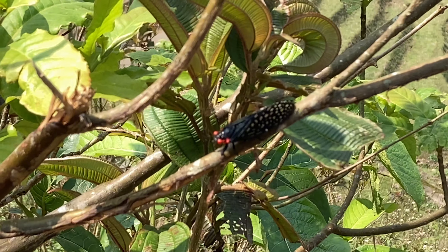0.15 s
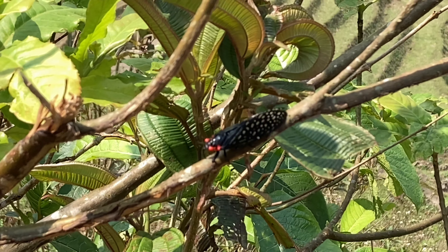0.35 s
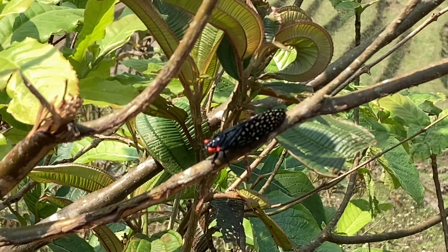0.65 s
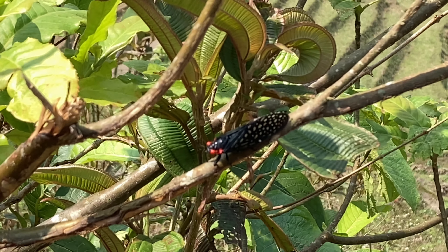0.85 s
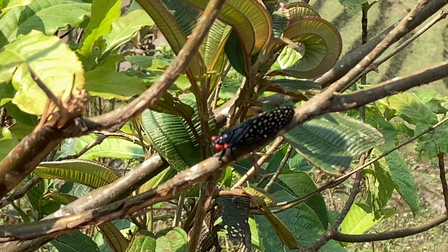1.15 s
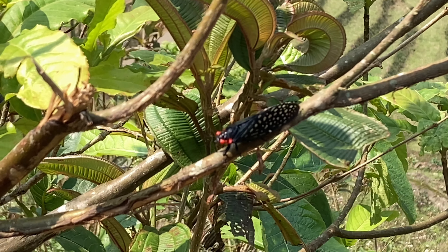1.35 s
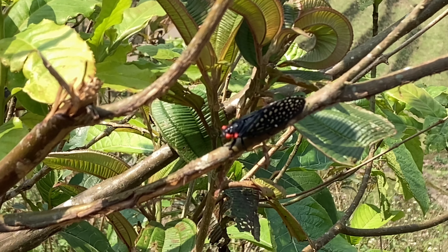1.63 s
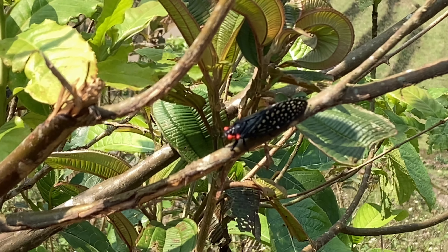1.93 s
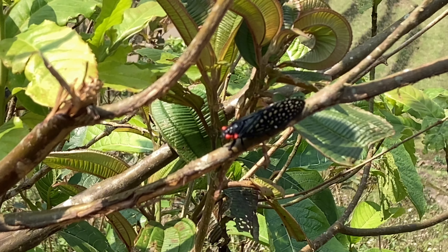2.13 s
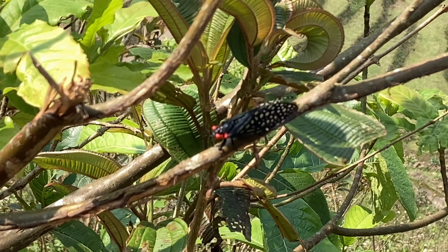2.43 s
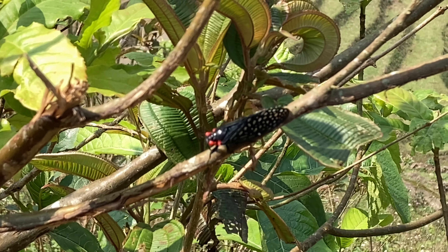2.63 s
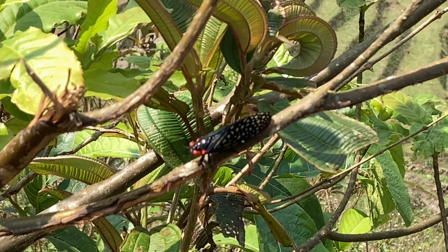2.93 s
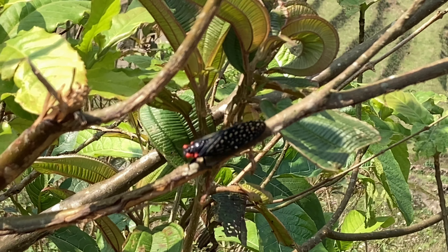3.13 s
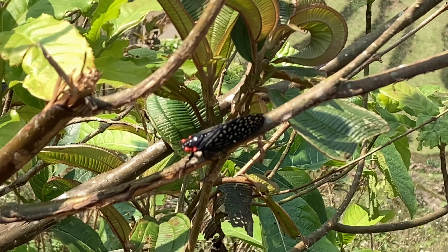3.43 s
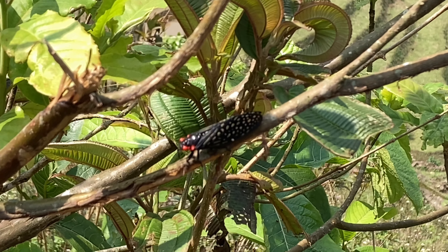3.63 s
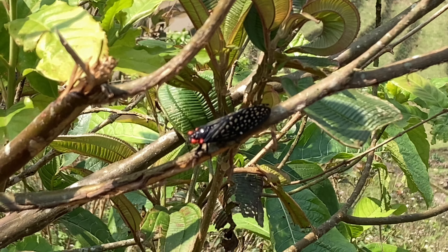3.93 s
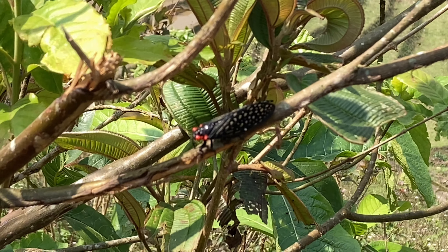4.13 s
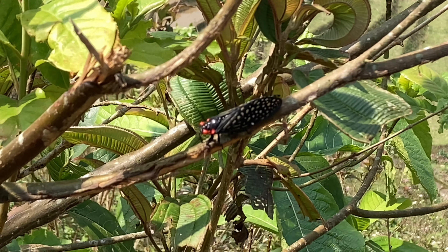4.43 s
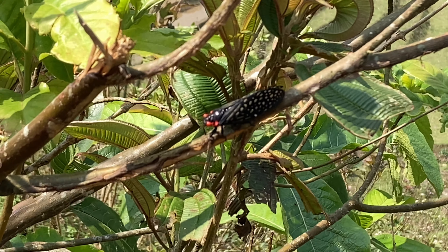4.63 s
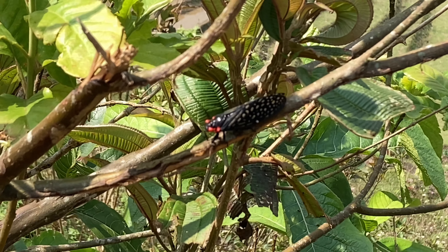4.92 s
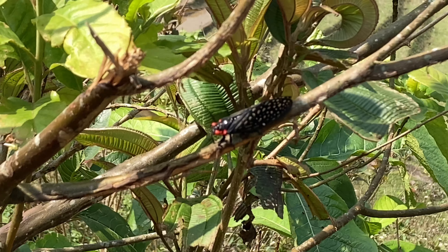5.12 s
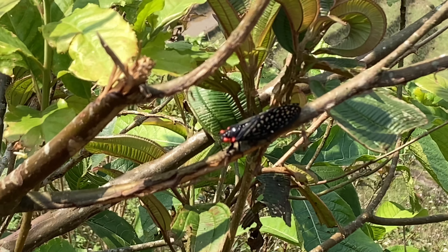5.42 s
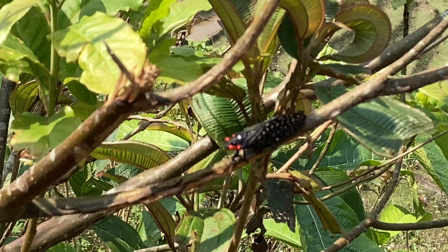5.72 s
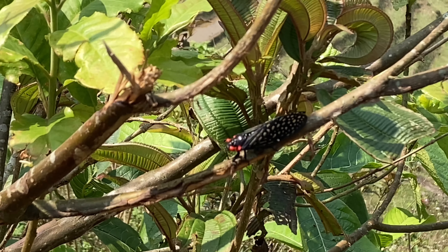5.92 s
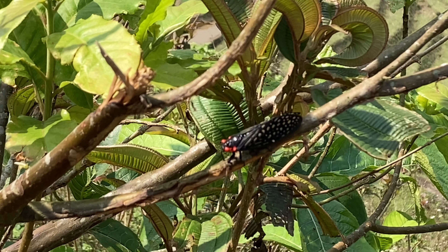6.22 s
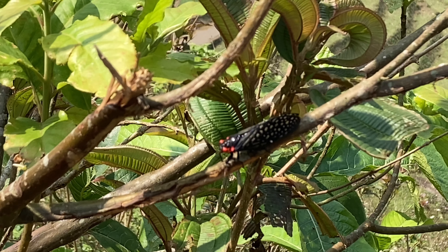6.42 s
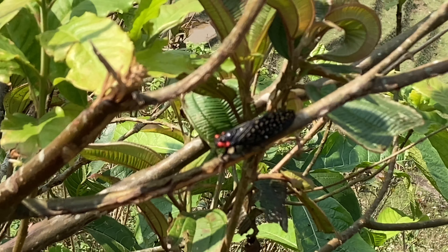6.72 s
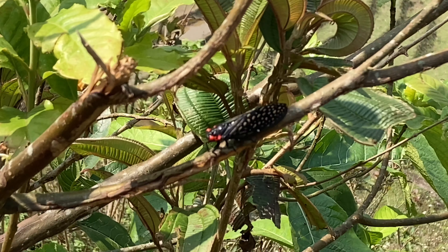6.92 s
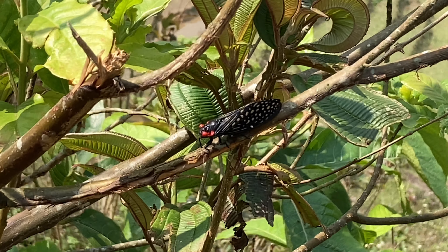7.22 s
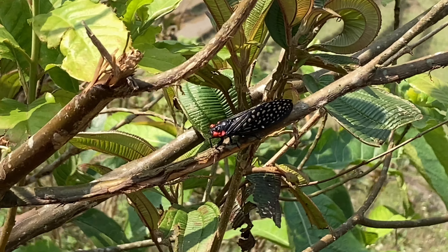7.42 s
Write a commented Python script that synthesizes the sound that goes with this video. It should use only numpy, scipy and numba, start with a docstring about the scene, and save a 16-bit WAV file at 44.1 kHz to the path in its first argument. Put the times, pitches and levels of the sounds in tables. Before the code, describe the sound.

Outdoors among leafy shrubs, a cicada sings very close to a small stereo microphone. Harsh bright rasps pulse about twelve per second, the last held longer, then a dry roll of ticks speeds up and softens. The cycle repeats about every two seconds with a few tiny thin whistles. Behind it lie a distant engine throb, a wavering low drone and gusty wind bumps.

```python
"""A cicada sings close by: thirteen swelling rasps, the last one held, then a quickening roll of dry ticks,
over and over, with a few thin whistles. Its tymbal ribs buckle one after another as band-limited clicks,
which ring the abdomen through filters and a moving resonance; leaves scatter the song as decaying noise echoes.
Behind it far engine thuds excite a wandering boom, a drone wavers under gusty low-pitched wind noise,
faint open air hisses, and one soft blip falls in pitch."""
import sys
import numpy as np
from scipy import signal
from scipy.fft import rfft, irfft
from scipy.io import wavfile
from scipy.ndimage import uniform_filter1d
from numba import njit

SR = 44100
rng = np.random.default_rng(int(sys.argv[2]) if len(sys.argv) > 2 else 0)


def master(y):
    """Save y as 16-bit WAV."""
    cut = np.clip(np.atleast_2d(y).T, -1, 1)
    pcm = np.round(cut * 32767)  # scale
    wavfile.write(sys.argv[1], SR, pcm.astype(np.int16))


N = 333396
TIME = np.arange(N) / SR
BINS = np.fft.rfftfreq(2 ** 19, 1 / SR)  # Hz, of a transform longer than the scene
TOP_HZ = 15900  # upper limit of the recorder

# spectral colour of the relaxed abdomen: hz, relative_db
SLACK_COLOUR = [(700, -29.5), (1400, -9.5), (1900, -1), (2300, 1.5), (2900, 1), (3500, 6.5), (3950, 0.5),
                (4900, -6), (5900, -1), (7400, -14), (10000, -5.5), (12300, -15.5), (14000, -17.5),
                (15700, -19)]


def undb(db):
    """Decibels to amplitude gain."""
    return 10 ** (np.asarray(db) / 20)


def unit(x):
    """Normalisation to an rms of 1."""
    return x / np.sqrt(np.mean(x ** 2))


def curve(table, at=TIME):
    """Linear interpolation of each further column of a table over its first."""
    first, *columns = np.transpose(table)
    return [np.interp(at, first, column) for column in columns]


def colour(x, points, size=4096):
    """Minimum-phase filter of unit energy through (hz, db) points: folding the cepstrum makes it causal."""
    hz, db = np.transpose(points)
    log_hz = np.log(np.fft.rfftfreq(size, 1 / SR) + 1)  # 1 Hz up, to avoid log 0
    log_gain = np.log(undb(np.interp(log_hz, np.log(hz), db)))
    cepstrum = irfft(log_gain)[:size // 2]
    cepstrum[1:] *= 2
    ring = irfft(np.exp(rfft(cepstrum, size)))
    return signal.fftconvolve(x, ring / np.linalg.norm(ring))[:N]


def walk(rate):
    """Slow random fluctuation of rms 1: random steps, rate per second, smoothed twice."""
    hold = int(SR / rate)
    steps = np.repeat(rng.standard_normal(N // hold + 1), hold)
    return unit(uniform_filter1d(uniform_filter1d(steps, hold), hold)[:N])


def clicks(times, sizes, order=6):
    """Band-limited impulses: windowed sinc pulses stand at exact times between samples."""
    at = np.ravel(times)[:, None] * SR
    taps = np.floor(at).astype(int) + np.arange(1 - order, order + 1)
    shape = np.sinc(taps - at) * np.cos(np.pi * (taps - at) / (2 * order)) ** 2
    weights = np.ravel(sizes)[:, None] * shape
    return np.bincount(np.clip(taps, 0, N).ravel(), weights.ravel(), N + 1)[:N]


def beats(rate):
    """Phase accumulation: the times at which each cycle of a changing rate begins."""
    turns = np.cumsum(rate) / SR
    return np.interp(np.arange(np.ceil(turns[-1])), turns, np.arange(len(rate)) / SR)


@njit
def resonance(x, hz, width):
    """Second-order resonator whose centre moves: a state-variable band-pass of constant width in Hz."""
    y, band, low = np.empty(len(x)), 0., 0.
    for i in range(len(x)):
        g, damping = np.tan(np.pi * hz[i] / SR), width / hz[i]
        v = (band + g * (x[i] - low)) / (1 + g * (g + damping))
        band, low, y[i] = 2 * v - band, low + 2 * g * v, damping * v
    return y


def wide_noise(points, side):
    """Partial stereo coherence: a shared coloured noise plus another of opposite sign left and right."""
    middle, apart = (unit(colour(rng.standard_normal(N), points)) for _ in range(2))
    return middle + side * apart * np.array([[1], [-1]])


def open_air(air_db=-48.0, calming_db=-3):
    """Broadband ambient noise: filtered noise whose level wanders slowly and calms."""
    # colour of the open air: hz, relative_db
    air_colour = [(30, -39), (120, -30.5), (280, -4), (450, -1), (650, -3), (1000, -12), (1500, -9),
                  (2500, -5), (4000, -10.5), (8000, -19), (15000, -22)]
    level_db = air_db + calming_db * TIME / TIME[-1] + walk(1.89)
    return wide_noise(air_colour, side=1.5) * undb(level_db)


def rumble(wind_db=1.5, drone_db=-0.5, waver_db=4.0, pan_db=2, buffet_db=-14):
    """Turbulent wind noise over a frequency-modulated drone: gust powers add to the breeze; strong gusts buffet."""
    # low drone: time_s, pitch_hz, level_db (before drone_db and the waver)
    drone_track = [(0.0, 48.8, -38), (0.51, 50.3, -41), (0.78, 48.8, -36), (1.2, 49.2, -48),
                   (1.37, 48.8, -31), (1.45, 51.7, -54), (1.62, 51.07, -38), (2.33, 50.74, -58),
                   (2.44, 47.46, -42), (2.82, 48.38, -63), (2.92, 48.2, -45), (3.33, 43.43, -37),
                   (5.28, 44.0, -34), (6.11, 46.7, -42), (7.18, 45.0, -33.5), (7.56, 44.63, -31)]
    # breeze between gusts: time_s, level_db (before wind_db)
    breeze = [(0, -34.5), (2.35, -40), (2.55, -42.5), (2.9, -48), (3.15, -40.5), (7.56, -41)]
    # gusts on the microphone: peak_s, half_width_s (to 1/e of the power), level_db (before wind_db)
    gusts = [(1.62, 0.056, -37.5), (3.42, 0.043, -33.5), (3.66, 0.051, -31), (4.549, .035, -37),
             (4.97, 0.065, -42), (5.49, 0.018, -32), (5.59, .03, -46), (6.101, 0.032, -35.5),
             (6.35, 0.021, -35), (6.77, 0.028, -45)]
    # colour of the wind: hz, relative_db
    wind_colour = [(20, -30), (35, -22), (50, 0.5), (70, 2.5), (110, -3.5), (180, -13), (300, -21),
                   (700, -48.5), (2000, -82)]
    # colour of a strong gust: hz, relative_db
    buffet_colour = [(60, -15), (130, 0), (220, -6), (400, -26), (1000, -60)]

    hz, db = curve(drone_track)
    tone = np.sqrt(2) * np.sin(2 * np.pi * np.cumsum(hz) / SR)
    drone = tone * undb(db + drone_db + waver_db * walk(7.5))
    power = undb(curve(breeze)[0]) ** 2
    for at, width, peak_db in gusts:
        power = power + undb(peak_db) ** 2 * np.exp(-((TIME - at) / width) ** 2)
    gust = np.sqrt(power) * undb(wind_db)
    buffet = wide_noise(buffet_colour, side=0.33) * gust / gust.max()  # grows faster than the wind itself
    wind = gust * (wide_noise(wind_colour, side=0.6) + undb(buffet_db) * buffet)
    return (drone + wind) * undb(np.array([[-pan_db], [pan_db]]) / 2)


def engine(width_hz=42.0, scatter_db=0.25, knock_db=-10.5, pan_db=3.0, echo_t60=0.16):
    """Impulse-excited resonance: slow exhaust thuds ring a wandering boom; the hillside blurs a weaker knock."""
    # far engine: time_s, thuds_per_s, boom_hz, level_db (of the boom, before panning)
    engine_track = [(0, 23, 143, -32.5), (.33, 16.4, 76.6, -34.5), (.75, 18.2, 89, -36),
                    (1.35, 22.4, 140.6, -37.5), (2.0, 26.2, 123, -39.5), (2.75, 21.4, 130, -42),
                    (3.3, 22, 136, -41), (3.75, 21.5, 137, -47.5), (4.3, 23, 155.8, -44.5),
                    (4.7, 21.5, 162, -47), (5.2, 19, 141, -82), (7.56, 17, 133.8, -54)]
    # colour of the knock: hz, relative_db
    knock_colour = [(40, -30), (150, -4), (260, 0), (400, -10), (700, -18), (1500, -45)]

    rate, boom_hz, db = curve(engine_track)
    times = beats(rate)
    thuds = clicks(times, undb(scatter_db * rng.standard_normal(512)[:len(times)]))
    boom = resonance(resonance(thuds, boom_hz, width_hz), boom_hz, width_hz)
    blur = signal.fftconvolve(thuds, undb(-60 * TIME[:SR // 2] / echo_t60))[:N]
    knock = colour(blur * rng.standard_normal(N), knock_colour)
    mix = unit(boom) + undb(knock_db) * unit(knock)
    return mix * undb(db + np.array([[-pan_db], [pan_db]]) / 2)


def plop(at_s=6.5785, from_hz=800, fall_s=0.0062, length_s=0.0089, db=-27):
    """Exponential chirp: one soft blip falls quickly in pitch under a half-sine envelope."""
    age = np.clip(TIME - at_s, 0, length_s)
    turns = from_hz * fall_s * (1 - np.exp(-age / fall_s))
    return undb(db) * np.sin(np.pi * age / length_s) * np.sin(2 * np.pi * turns)


def whistles():
    """Frequency modulation of a sine: brief, nearly pure notes bend through three pitches."""
    # thin whistles: start_s, length_s, start_hz, middle_hz, end_hz, level_db (rms at the height of the note)
    notes = [(0.123, 0.045, 3940, 3850, 4020, -27), (1.297, 0.034, 4080, 3950, 3610, -42),
             (5.688, 0.038, 4327, 4310, 4440, -46), (7.163, 0.063, 5900, 5400, 5200, -49)]
    out = np.zeros(N)
    for start, length, first, middle, last, db in notes:
        progress = np.clip((TIME - start) / length, 0, 1)
        hz = np.interp(progress, [0, .5, 1], [first, middle, last])
        tone = np.sin(2 * np.pi * np.cumsum(hz) / SR)
        out += undb(db) * np.sqrt(2) * np.sin(np.pi * progress) * tone
    return out


def tymbal(times, rib_hz, quicken, drift, jitter, scatter_db, taper, count):
    """Sequential buckling: each pull clicks a row of ribs at shrinking gaps. Returns click times and sizes."""
    slow, quick, size = rng.standard_normal((3, 2048, count))[:, :len(times)]
    place = (np.arange(count) + .5) / count  # along the row of ribs, 0-1
    slow_drift = unit(uniform_filter1d(slow, size=25, axis=0))  # shared by neighbouring pulls
    stretch = quicken * (.5 - place) + drift * slow_drift + jitter * quick
    gaps = np.exp(stretch) / rib_hz[:, None]
    sizes = np.sin(np.pi * place) ** taper * undb(scatter_db * size)
    click_times = times[:, None] + np.cumsum(gaps, axis=1) - gaps[:, :1]
    return click_times, unit(sizes) / np.sqrt(count)


def rolls(first_rib_hz=2200, last_rib_hz=2030, tick_db=-6, fade_db=-4.5, first_tick_db=-2, uneven_db=0.84,
          first_ring_hz=4080, last_ring_hz=3860, ring_width_hz=290.0, flurry_s=.02):
    """Impulsive excitation of the relaxed abdomen: single pulls, a brief flurry, then slow to quick and softer;
    the air sac's resonance sinks a little as the roll goes on."""
    # tick rolls: start_s, end_s, flurry_extra_ticks_per_s, slowest_ticks_per_s (without the flurry),
    # final_ticks_per_s
    roll_table = [(0.4242, 1.106, 27.3, 53.3, 100.9), (2.3269, 3.145, 20.1, 56.2, 98.2),
                  (4.3615, 5.097, 61.5, 53.3, 114.4), (6.267, 7.0, 50.3, 55.1, 97.7)]

    pulls, ring_track = [], []
    for start, end, flurry, slow, fast in roll_table:
        t = TIME[:int((end - start) * SR)]
        rate = slow * (fast / slow) ** (t / t[-1]) + flurry * np.exp(-t / flurry_s)
        age = beats(rate)
        progress = age / (end - start)
        late, strong = rng.standard_normal((2, 128))[:, :len(age)]
        wobble_s = .0006 * progress * late  # the beat loosens as it speeds up
        level_db = tick_db + fade_db * progress + first_tick_db * (age == 0) + uneven_db * strong
        pulls.append([start + age + wobble_s, progress, level_db])
        ring_track += [(start, first_ring_hz), (end, last_ring_hz)]
    times, progress, db = np.hstack(pulls)
    rib_hz = first_rib_hz + (last_rib_hz - first_rib_hz) * progress
    at, sizes = tymbal(times, rib_hz, quicken=.6, drift=.03, jitter=.065, scatter_db=1.2, taper=.4, count=7)
    ticks = colour(clicks(at, sizes * undb(db)[:, None]), SLACK_COLOUR)
    return ticks + resonance(ticks, curve(ring_track)[0], ring_width_hz)


def phrase(start, spacing, held_s, db, count=13):
    """Rhythmic acceleration: rasps come quicker, longer and louder, the last held. Rows: start_s, length_s, level_db."""
    quicken_s = .00028  # each spacing is this much shorter than the one before
    first_rasp_s, lengthen_s = .0305, .00225
    warm_up_db, warm_up_rasps = -4.5, 1.1  # soft start, and the rasps it takes to recover by 1/e
    k = np.arange(count)
    starts = start + spacing * k - quicken_s * k ** 2 / 2
    lengths = np.append(first_rasp_s + lengthen_s * k[:-1], held_s)
    levels = db + warm_up_db * np.exp(-k / warm_up_rasps)
    audible = (starts + lengths > 0) & (starts < TIME[-1])
    return np.transpose([starts, lengths, levels])[audible]


def rasps(pull_hz=258, sag=.7, slack_rib_hz=1950, taut_rib_hz=2600, soft_db=-20.0, gain_db=-1.0,
          release_s=0.0028, release_db=-12, slack_ring_hz=1980, taut_ring_hz=2500, ring_width_hz=300.0,
          ring_db=-4, uneven_db=0.9, pull_jitter_s=.00004):
    """Tension-controlled resonance: fast pulls; as the abdomen stretches, the ribs click faster, louder, brighter."""
    # phrases of rasps: start_s, first_spacing_s, held_last_rasp_s, level_db (before gain_db and the warm-up)
    phrase_table = [(-0.769, .0866, .116, -19.2), (1.143, .0868, .116, -18.7), (3.1768, .0867, .123, -19.2),
                    (5.1295, .0858, .088, -19.3), (7.0442, .0859, .116, -20.4)]
    # swell of a rasp: age_s, tension (0-1)
    swell = [(0, 0.1), (.006, 0), (.013, 0.48), (.021, 0.8), (.031, 0.8), (.044, 0.84)]
    # spectral colour of the stretched abdomen: hz, relative_db
    taut_colour = [(700, 1.5), (1400, -19), (1900, -4), (2500, -11.5), (3200, 7), (3700, 6), (4800, 2),
                   (5900, -1), (7400, -6), (8200, -9), (9600, -14), (12200, -6), (14400, -24),
                   (15700, -25.5)]

    pulls = []
    for start, length, db in np.vstack([phrase(*row) for row in phrase_table]):
        t = TIME[:int((length + release_s) * SR)]
        age = beats(pull_hz * (1 - sag * t))  # the muscle slows in a long rasp
        late, strong = rng.standard_normal((2, 64))[:, :len(age)]
        tension = np.clip(curve(swell, age)[0], 0, 1)
        release = np.clip((age - length) / release_s, 0, 1)  # a pull past the rasp's length is weaker
        level_db = db + soft_db * (tension.max() - tension) + release_db * release + uneven_db * strong
        pulls.append([start + age + pull_jitter_s * late, tension, level_db])
    times, tension, db = np.hstack(pulls)
    rib_hz = slack_rib_hz + (taut_rib_hz - slack_rib_hz) * tension
    at, sizes = tymbal(times, rib_hz, quicken=.55, drift=.06, jitter=.04, scatter_db=1.5, taper=.7, count=9)
    sizes = sizes * undb(db + gain_db)[:, None] * np.sqrt(SR / pull_hz)  # level spread over the pull period
    share = tension[:, None]
    taut_buzz = colour(clicks(at, sizes * share), taut_colour)
    slack_buzz = colour(clicks(at, sizes * (1 - share)), SLACK_COLOUR)
    buzz = taut_buzz + slack_buzz
    # the abdomen rings higher as it stretches
    ring_hz = np.interp(TIME, times, slack_ring_hz + (taut_ring_hz - slack_ring_hz) * tension)
    return buzz + undb(ring_db) * resonance(buzz, ring_hz, ring_width_hz)


def body_wall(x, smear_s=0.00058, hollow_hz=3590, hollow_width_hz=190, hollow_db=-6):
    """Dispersion and small-source radiation: the thin wall delays treble and radiates little bass; the song
    also has a narrow dip near 3.6 kHz."""
    phase = np.pi * smear_s * BINS ** 2 / TOP_HZ  # delay grows with frequency, to smear_s at TOP_HZ
    radiation = BINS ** 4 / (BINS ** 4 + 1150 ** 4)
    hollow = undb(hollow_db * np.exp(-((BINS - hollow_hz) / hollow_width_hz) ** 2))
    response = radiation * hollow * np.exp(-1j * phase)
    return irfft(rfft(x, 2 * (len(BINS) - 1)) * response)[:N]


def foliage(x, near_db=-7.5, near_t60=0.038, far_db=-23, far_t60=0.54, gap_s=0.00088, sway=0.9):
    """Multiple scattering: near leaves scatter the song at once and shift slowly; far bushes add a faint tail."""
    t = TIME[:SR // 2]

    def scatter(t60):
        """Diffuse decay: convolution with a separate fading noise for each ear."""
        echo = rng.standard_normal((2, len(t))) * undb(-60 * t / t60) * (t > gap_s)
        echo = echo / np.linalg.norm(echo, axis=1, keepdims=True)
        return signal.fftconvolve(x[None], echo, axes=1)[:, :N]

    angle = sway * walk(1.978)  # radians, blends two scatterings at constant power
    near = np.cos(angle) * scatter(near_t60) + np.sin(angle) * scatter(near_t60)
    return undb(near_db) * near + undb(far_db) * scatter(far_t60)


def ports(x):
    """Interaural-like phase difference: the sound reaches the two microphone ports with different phase."""
    # phase by which the left port leads for the cicada: hz, phase_rad
    port_phase = [(150, 0), (1800, 0.5), (3200, 2.7), (3900, 1.4), (4900, 2.6), (6000, 2.1), (7100, 0.1),
                  (8300, -2.8), (9400, -3.2), (10500, -5.7), (11800, -6.4), (13200, -9.4), (14300, -9.5),
                  (15200, -12.4)]
    turn = np.exp(.5j * curve(port_phase, BINS)[0])  # half the lead on each side
    return irfft(rfft(x, 2 * (len(BINS) - 1)) * np.array([turn, 1 / turn]))[:, :N]


def scene():
    """Superposition: the cicada, direct and scattered by leaves, over the low background."""
    song = body_wall(rasps() + rolls()) + whistles()
    background = open_air() + rumble() + engine() + plop()
    return background + foliage(song) + ports(song)


def record(dry):
    """Band limitation: the recorder's steep elliptic low-pass cuts the top."""
    low_pass = signal.ellip(10, .2, 80, TOP_HZ, fs=SR, output="sos")  # ripple dB, stop-band dB
    return signal.sosfilt(low_pass, dry)


dry = scene()
out = record(dry)
master(out)
```